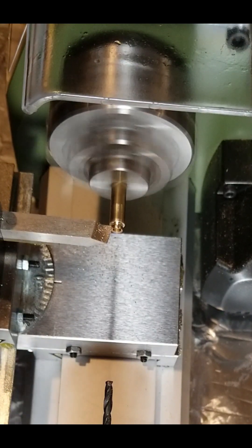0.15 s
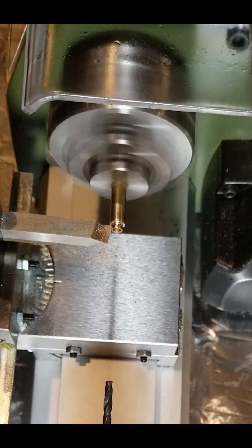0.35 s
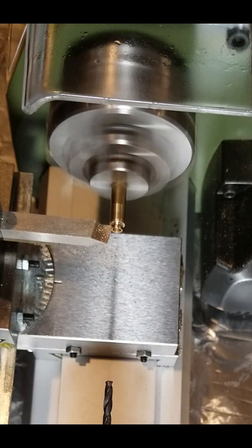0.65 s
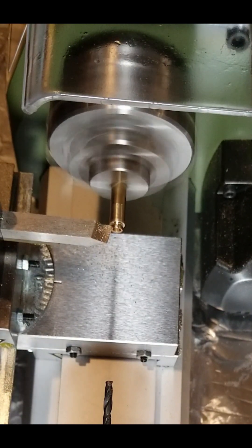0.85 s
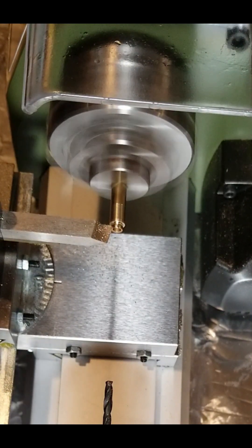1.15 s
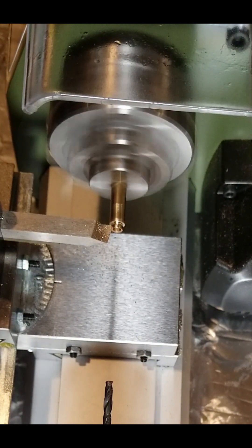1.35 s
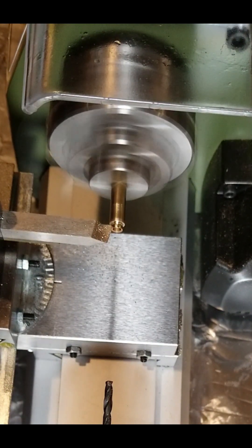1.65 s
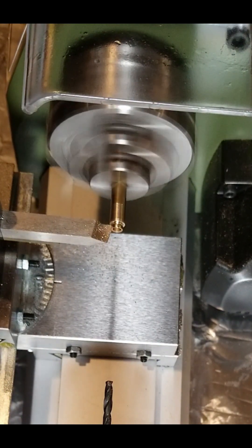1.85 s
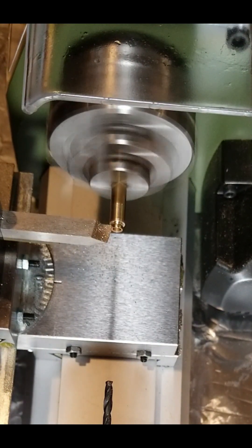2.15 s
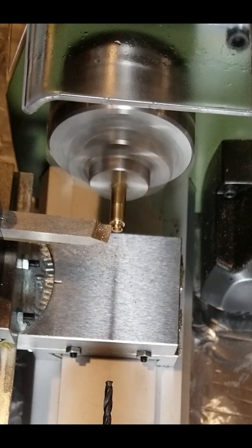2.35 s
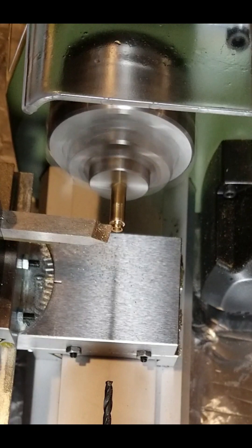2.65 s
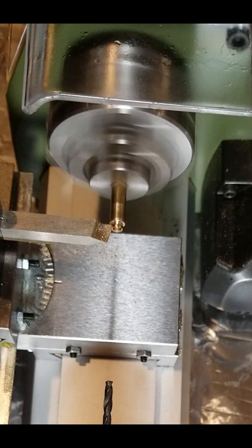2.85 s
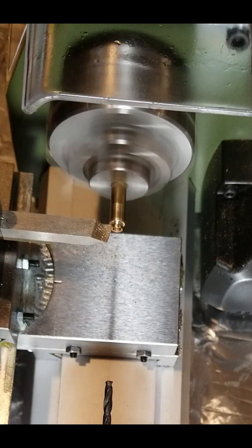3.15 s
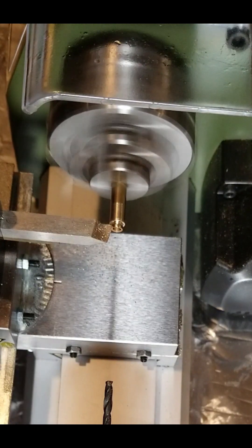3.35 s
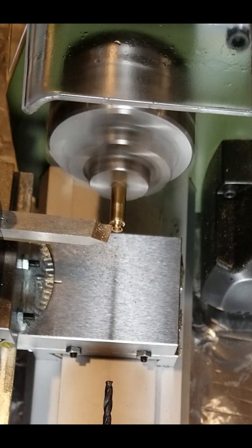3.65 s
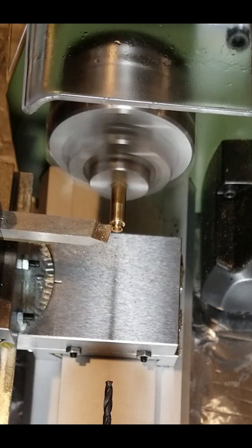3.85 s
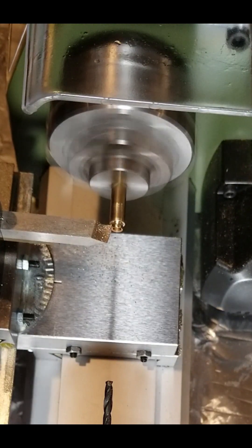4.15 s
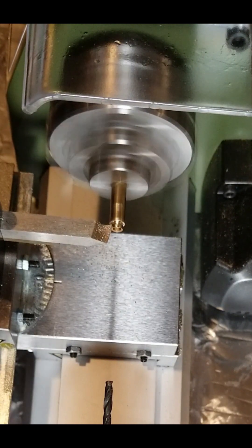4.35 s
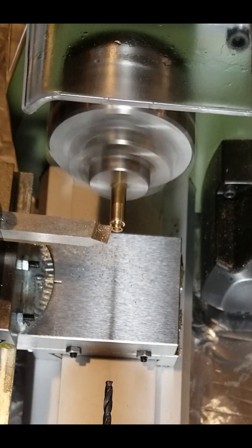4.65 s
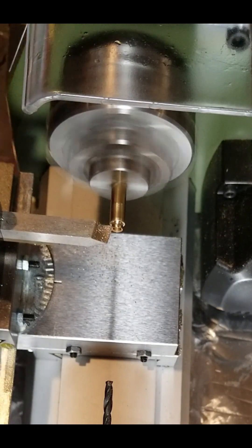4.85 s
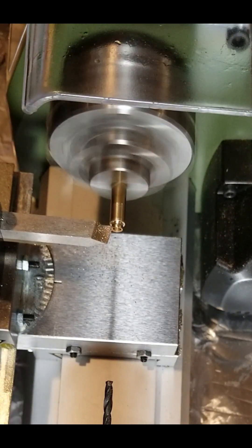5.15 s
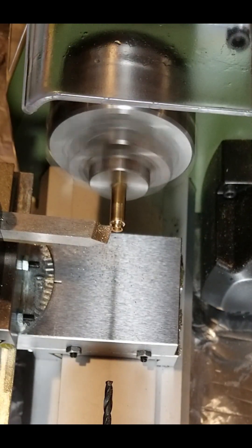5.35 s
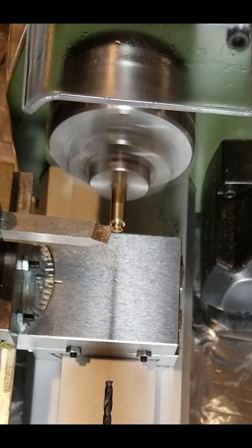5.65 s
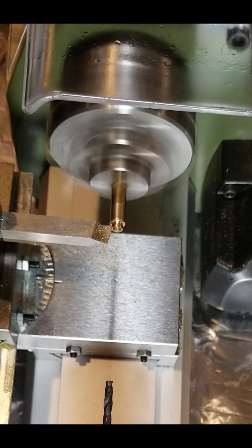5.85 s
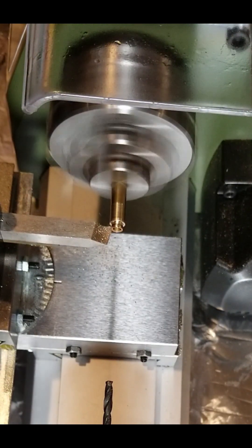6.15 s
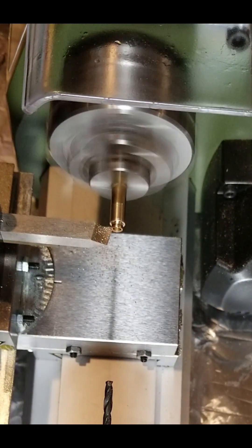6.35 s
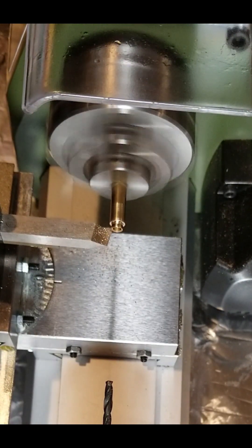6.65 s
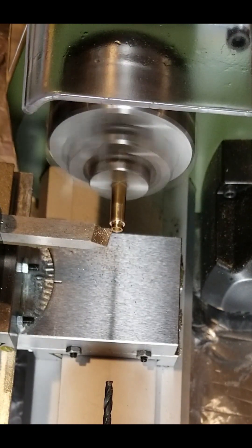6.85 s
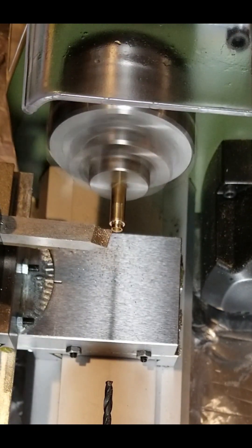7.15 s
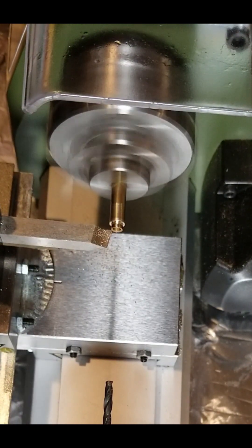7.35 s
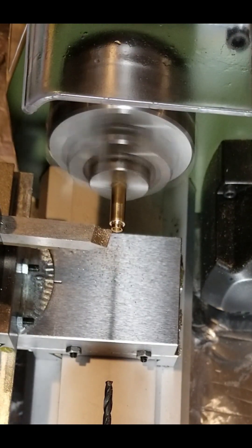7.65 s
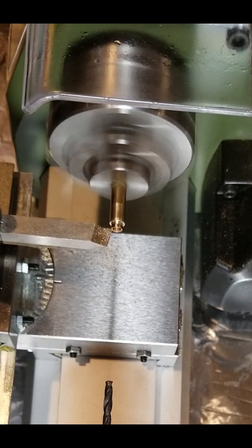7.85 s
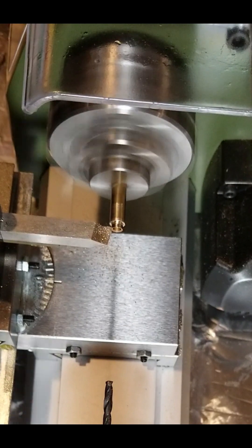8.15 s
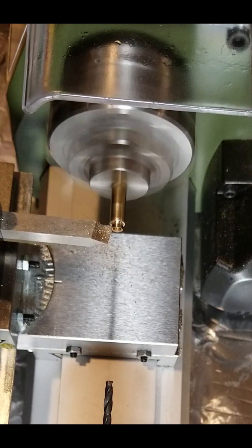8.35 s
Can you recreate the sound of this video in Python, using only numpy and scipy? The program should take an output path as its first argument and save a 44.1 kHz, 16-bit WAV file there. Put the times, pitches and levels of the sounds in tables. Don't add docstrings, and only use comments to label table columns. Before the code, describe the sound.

Rapid piercing squeaks stutter over an electric motor whine and hum as brass is turned; later the squeals fade and rhythmic rough scrapes follow.

```python
import sys
import numpy as np
from scipy import signal
from scipy.io import wavfile
from scipy.ndimage import uniform_filter1d

SR = 44100
rng = np.random.default_rng(int(sys.argv[2]) if len(sys.argv) > 2 else 0)


def generate_wav(sig):
    pcm = np.round(np.clip(np.atleast_2d(sig).T, -1, 1) * 32767).astype(np.int16)
    wavfile.write(sys.argv[1], SR, pcm)


def nominal_scale(level):
    x = np.asarray(level, float) / 20
    return 10 ** x


N = 374838

TEETH, TEETH_PER_TURN = 22, 51.3
MEAN_WHINE_DB, MEAN_RASP_DB = -44, -50
UPPER_DB = -55
CASING_LEAD = 8
NIP_DB, NIP_HZ, NIP_MS = 5.5, 4020, 1.2
SILENT_DB, HIGH_ENDS_MS = -60, 6.96

# time in seconds, speed swing as a share, hum wander in Hz.
SPEED_JITTER = [(0, .0025, 3), (2.6, .0025, 3), (3.5, .0006, 1.2), (8.5, .0006, 1.2)]
# time in seconds, peak in dB, length in ms.
DIGS = [(4.011, -26, 12), (4.395, -31, 11), (4.4935, -30, 14), (5.266, -28, 24), (5.308, -32, 11.3),
        (5.442, -29, 12), (5.586, -34, 16), (5.938, -26, 33), (5.9624, -25, 20), (6.007, -24.5, 19),
        (6.102, -25, 6.3), (6.142, -17, 11), (6.183, -30, 16), (6.25, -28, 37), (6.297, -24.5, 22),
        (6.347, -23, 13), (6.3948, -21, 7.2), (6.522, -22, 20), (6.565, -26.5, 22), (6.657, -30.5, 53),
        (7.997, -21, 12.5), (8.088, -26.5, 23), (8.1321, -29.5, 9.8), (8.175, -28, 26), (8.216, -26, 21),
        (8.2666, -24, 28), (8.321, -24.5, 20), (8.371, -29, 30), (8.4034, -22.5, 17), (8.443, -23.5, 23)]


def unit(x):
    return x / np.sqrt(np.mean(np.abs(x) ** 2) + 1e-20)


def in_time(rows):
    s, *columns = np.transpose(rows)
    return [np.interp(np.arange(N) / SR, s, c) for c in columns]


def at_hz(points, hz):
    points_hz, values = np.array(points).T
    return np.interp(np.log(hz), np.log(points_hz), values)


def drift(rate_hz):
    r = np.exp(-80 * np.pi * rate_hz / SR)
    slow = signal.lfilter([1], [1, -2 * r, r * r], rng.standard_normal(N // 40 + 2002))[2000:]
    return np.interp(np.arange(N) / 40, np.arange(len(slow)), unit(slow))


def bandpass(x, low_hz, high_hz):
    return signal.sosfilt(signal.butter(2, [low_hz, high_hz], "band", fs=SR, output="sos"), x)


def resonate(x, hz, width_hz):
    r = np.exp(-np.pi * width_hz / SR)
    poles = [1, -2 * r * np.cos(2 * np.pi * hz / SR), r * r]
    return signal.lfilter([(1 - r * r) / 2, 0, (r * r - 1) / 2], poles, x)


def body(x, modes):
    out = 0
    for k, (hz, width_hz, db) in enumerate(modes):
        ringing = resonate(resonate(x, hz, 1.6 * width_hz), hz, 1.6 * width_hz)
        out = out + nominal_scale(db) * (-1) ** k * ringing
    return unit(out)


def balance(pan_db):
    return nominal_scale([[pan_db / 2], [-pan_db / 2]])


def pair(mid, side, alike, pan_db):
    return (np.sqrt(1 + alike) * mid + np.sqrt(1 - alike) * side * [[1], [-1]]) * balance(pan_db)


def tone(wave, pan_db, lead_rad):
    return np.real(wave * balance(pan_db) * [[1], [np.exp(-1j * lead_rad)]])


def spaced(x, count):
    return np.array([x[0], np.roll(x[1], count)])


def add(out, s, wave):
    i = round(s * SR) - wave.shape[1] // 2
    low, high = max(i, 0), min(i + wave.shape[1], N)
    out[:, low:high] += wave[:, low - i:high - i]


def squeal_rows():
    # time in seconds, low mode peak in dB, its length
    # in ms, high mode peak in dB, its end in ms.
    main_bites = [(0.0038, -12, 3.2, -16, 8.4), (0.0217, -17, 3.9, -20, 14), (0.0427, -36, 2.5, -24, 5.8),
                  (0.0523, -12, 3, -18, 8.3), (0.0833, -20, 4, -30, 8.3), (0.1008, -12, 2.4, -16, 8.2),
                  (0.1476, -28, 3.9, -26, 9.9), (0.1646, -25.5, 2.9, -28, 8.7), (0.187, -42.5, 2.5, -26.0, 5.5),
                  (0.1964, -12, 4.9, -15, 7.3), (0.2422, -19.5, 3.3, -26, 6.6), (0.288, -18.5, 3.7, -23, 6.9),
                  (0.3201, -41, 2.5, -28.5, 5.8), (0.3292, -28.0, 2.8, -39.0, 5.9), (0.3485, -14.5, 2.8, -17, 8),
                  (0.36, -25, 2.6, -37, 6.5), (0.3695, -17.5, 2.7, -19, 6.1), (0.3809, -24.5, 2.9, -36.0, 8.3),
                  (0.4004, -10.5, 2.7, -13, 6.2), (0.4102, -24, 5.9, -27.5, 6.8), (0.4212, -12.5, 3.2, -16, 5.1),
                  (0.4393, -29, 5.5, -32, 12), (0.4526, -14, 3.1, -19.0, 6.5), (0.4974, -11.5, 3.9, -13, 5.7),
                  (0.5289, -36, 3.8, -28.5, 8.3), (0.5436, -21, 2.5, -21, 12), (0.5686, -47.5, 2.5, -19, 5.2),
                  (0.5775, -14, 4.5, -22.0, 7.9), (0.591, -10.5, 3.9, -15, 7.4), (0.6227, -26, 3.3, -36.5, 5.9),
                  (0.6373, -25, 2.6, -33, 7.0), (0.6484, -25, 3.3, -23, 9.7), (0.666, -36.5, 2.5, -30.0, 8.7),
                  (0.68, -31, 2.5, -38, 12.8), (0.6981, -22, 2.8, -21.5, 8.2), (0.7495, -25, 3.8, -26.5, 15),
                  (0.7804, -27, 3.6, -31, 10), (0.796, -12, 4, -12.5, 6.5), (0.8036, -27.5, 2.0, -41, 7.6),
            (0.8095, -39, 2.5, -40, 6.1), (0.8274, -22.5, 3.7, -22, 7.9), (0.8386, -24, 2.9, -28.5, 7.7),
            (0.8583, -28, 2.5, -26, 9.8), (0.8895, -10, 2.4, -15.5, 9.6), (0.9227, -10.5, 3.5, -21, 8.9),
            (0.9353, -17.0, 2.7, -22, 8.2), (0.9565, -11.5, 3.2, -13.5, 6.4),
            (0.9643, -27.5, 2.0, -35.5, 5.7), (0.9878, -19.5, 2.5, -25, 6.6),
            (1.0113, -46.0, 2.5, -28.5, 6.5), (1.025, -37.5, 2.5, -30.0, 4.9),
            (1.033, -21, 4.7, -33.5, 7.3), (1.1155, -49.0, 2.5, -30.0, 4.9), (1.124, -11.5, 2.9, -19, 7.4),
            (1.1763, -46.0, 2.5, -29.0, 5.1), (1.1841, -19.5, 2.8, -33.0, 5.4),
            (1.2397, -29, 3.2, -46, 9.1), (1.279, -21, 3.0, -27, 7.7), (1.298, -20.0, 2.5, -25.0, 9.7),
            (1.3212, -40.5, 2.5, -28.0, 5.9), (1.3297, -16, 3.7, -23, 5.6), (1.3433, -43, 2.5, -31, 4.7),
            (1.3518, -11.0, 2.9, -10, 6.3), (1.3618, -28.0, 3.1, -38, 12), (1.373, -34, 2.5, -37, 7.1),
            (1.383, -21.5, 3.6, -37.0, 7.2), (1.3962, -11.5, 2.9, -13.5, 6.7), (1.42, -43.5, 2.5, -18, 6.2),
            (1.4282, -9.5, 3.2, -18, 7), (1.461, -33, 3.9, -23, 8.4), (1.4703, -10, 3.5, -19, 7.1),
            (1.486, -14, 2.7, -17.5, 8.7),
                  (1.5063, -19, 2.4, -21, 8.5), (1.5171, -29, 4.0, -39, 8.2), (1.5543, -15.5, 2.2, -14.5, 8.1),
              (1.5864, -16, 2.4, -15.5, 8.3), (1.61, -27.5, 3.7, -30.5, 8.1), (1.635, -9.5, 4.1, -16, 7.9),
              (1.6485, -43.5, 2.5, -32, 6.5), (1.657, -25, 2.7, -21, 6.5), (1.666, -11, 3.6, -24, 5.0),
              (1.678, -11.5, 2.3, -14.5, 7), (1.7596, -46.0, 2.5, -23, 5.9), (1.7668, -13, 2.5, -17, 8),
              (1.799, -27, 4.2, -37.0, 4.9), (1.844, -23.5, 2.6, -25, 4.5), (1.9021, -22, 2.5, -26, 9.8),
              (2.1843, -31, 3.1, -36.5, 4.5), (2.2094, -26, 2.8, -27, 5.2), (2.2398, -20.5, 3.7, -17, 4.1),
              (2.2636, -44.5, 2.5, -27, 6), (2.2774, -22.5, 3.6, -22.5, 10), (2.3089, -21, 3.5, -23, 11),
              (2.3188, -9, 3, -16, 8), (2.3558, -29.5, 2.5, -27, 7.7), (2.3656, -12, 3.8, -25, 6.2),
              (2.42, -17, 2.8, -23, 6.0), (2.4415, -10.5, 3, -15, 7.6), (2.4653, -43.0, 2.5, -21.5, 5.7),
              (2.4736, -10, 4, -17, 5.7), (2.7266, -24.5, 2.9, -31, 4.5), (2.8378, -29, 3.5, -38.0, 4.5),
              (3.0639, -25.5, 2.9, -42.0, 4.6), (3.117, -23.5, 2.7, -34.0, 4.7), (3.23, -26, 2.2, -31.5, 7),
              (3.255, -54.0, 2.5, -27, 5.0), (3.2617, -21, 4.4, -29, 5.1), (3.3138, -27.5, 3.8, -33.5, 4.8)]
    catches = [
        (4.01, -29, 3, -42, 5),
        (4.4931, -22, 4.1, -36, 5.7),
    ]
    # time in seconds, peak in dB.
    ticks = [(2.5308, -29), (2.5846, -27), (2.6126, -27), (2.653, -31), (2.6765, -28), (2.7687, -29),
             (2.7927, -30), (2.872, -26), (2.9194, -35), (2.9493, -32), (2.979, -29), (3.0306, -26),
             (3.048, -27), (3.075, -25), (3.2965, -26), (3.3717, -36), (3.405, -29), (3.4441, -41),
             (3.5099, -39), (3.5902, -30), (3.6531, -39), (3.704, -35), (3.8167, -29), (3.9759, -36)]
    squeals = main_bites + catches + [(s + 0.0018, db, NIP_MS, db - 6, 5) for s, db in ticks]
    return [(s, db, 4066 - 4.3 * db, ms, high_db - 1.5, end_ms) for s, db, ms, high_db, end_ms in squeals]


def flutter_rows(chatter_db):
    rows = []
    for s, size, split, ms in rng.random((360, 4)) * [N / SR, 1, 1, 1]:
        db = chatter_db[int(s * SR)] - 3.5 + 7 * size - 7 * (2.5 < s < 3.4)
        high_db = db + 0.5 - 9 * split - 10 * (s > 3.4)
        rows.append((s, db, 4200, 1.0 + 1.1 * ms, high_db, 5 + 3 * ms))
    return rows


def dig_rows():
    rows = []
    for (s, db, ms), (a, b) in zip(DIGS, rng.random((len(DIGS), 2)) - .5):
        rows.append((s, db + NIP_DB - 0.3017 * ms, NIP_HZ + 170 * a, NIP_MS + b, SILENT_DB, HIGH_ENDS_MS))
    return rows


def burr_rows():
    # time in seconds, peak in dB.
    burr = [(4.6805, -33), (5.0053, -33), (5.2638, -29), (5.4333, -38), (5.4852, -36), (5.584, -33),
            (5.613, -36), (5.6279, -31), (5.7002, -33), (5.7626, -31), (5.812, -30), (5.9067, -30)]
    return [(s + NIP_MS / 1000, db + NIP_DB, NIP_HZ, NIP_MS, SILENT_DB, HIGH_ENDS_MS) for s, db in burr]


def low_mode(t, hz, ms, c):
    swell = np.exp(-(t / (ms / 1000 * np.where(t < 0, .7, .4))) ** 2)
    climb_hz_per_s = np.where(t < 0, 50000 * c[2] - 15000, 85000)
    return swell * np.exp(1j * 2 * np.pi * (hz * t + climb_hz_per_s * t ** 2 + c[0]))


def high_mode(t, end_ms, c):
    hold = .5 * (np.tanh((t - .0023) / .0009) - np.tanh((t - end_ms / 1000) / .0014))
    hold = hold * nominal_scale(.8 * np.sin(2 * np.pi * (300 * t + c[2])))
    hold = hold + .08 * (t > .002) * np.exp(-np.abs(t) / .007)
    climb = 380 * .0016 * np.exp(-np.maximum(t - .001, -.002) / .0016)
    return hold * np.exp(1j * 2 * np.pi * ((4680 + 130 * c[3]) * t + climb + c[1]))


def hand_over(t, low, low_db, high, high_db, cracks, c):
    sweep = np.exp(1j * 2 * np.pi * (4400 * t + 50000 * (t - .001) ** 2 + c[0]))
    lift = np.exp(-((t - .002) / 0.0054) ** 2)
    start = round(c[1] * 4000)
    wave = nominal_scale(low_db - 30.5) * tone(low ** 2, pan_db=8, lead_rad=.1)
    wave += nominal_scale(high_db - 27.0) * tone(np.roll(lift, 50) * high ** 2, pan_db=24.5, lead_rad=.1)
    wave += nominal_scale(low_db - 22) * lift ** 2 * cracks[:, start:start + len(t)]
    wave += nominal_scale(low_db - 29.5) * tone(lift * sweep ** 3, pan_db=7, lead_rad=11.4)
    return wave


def bites(chatter_db):
    out, t = np.zeros((2, N)), np.arange(-650, 651) / SR
    rows = squeal_rows() + dig_rows() + flutter_rows(chatter_db) + burr_rows()
    cracks = bandpass(rng.standard_normal((2, 6001)), 2500, 14000)
    for (s, low_db, low_hz, ms, high_db, end_ms), c in zip(rows, rng.random((len(rows), 4))):
        low, high = low_mode(t, low_hz, ms, c), high_mode(t, end_ms, c)
        wave = nominal_scale(low_db) * tone(low, pan_db=7.5, lead_rad=4.92)
        wave += nominal_scale(high_db) * tone(high, pan_db=-3.0, lead_rad=4.79)
        wave += hand_over(t, low, low_db, high, high_db, cracks, c)
        add(out, s, wave)
    return out


def whine(teeth, tooth_hz, first_db):
    # multiple of tooth rate, level in dB,
    # tilt in dB per Hz of tooth rate, left-right in dB, left lead in rad.
    orders = [(.2525, -15.5, 0.2, 13, 0.24), (1.045, -11, 1.5, 5, 0.5), (1.203, -3.5, -0.1, 7, 0.27),
              (1.25, -12, 2, -1, 0.76), (2, 4.6, .5, 7, 2.54), (1.955, -6, 0, -2, 3.17),
              (2.045, -11, 1, -2, 0.4), (2.955, -10, -0.54, 6, 0.39), (3, -6.5, 0.5, -15, 0.7),
              (4, 2, 0, -0.5, 4.74), (5, 1.5, 0, -12.5, 2.7), (6, -22, 0, -6, .3), (7, -10, 0, -2, 0.27),
              (8, -9, 0, 3, 1.5), (9, -10, -.2, 0, 1), (10, 4.5, -0.27, -7.5, 4.53),
              (11, -4, -.2, -2, 2), (12, -13, .5, 6, 1.28), (13, -10, .3, -10, 6.9),
              (1.907, -20, 1, 2, 1), (3.044, -17, .5, 2, 1), (1.089, -14, 1, 3, .5), (1.295, -18, 1, 3, .5),
            (2.087, -15, 1, 2, 1), (2.158, -15, 1, 2, 1), (2.25, -16, 1, 2, 1), (2.309, -15, -1, 2, 1),
            (2.577, -15, -1, 2, 1), (3.452, -13, 0, 2, 1), (4.25, -19, .5, 0, 1), (4.5, -16, 0, 0, 1),
            (4.797, -13, .1, 0, 1), (9.955, -6, .5, 12, 1), (10.96, -11, -.2, 0, 1)]
    run_out = 0.022 * np.sin(teeth / TEETH) + 0.078 * np.sin(2 * teeth / TEETH_PER_TURN)
    phase = teeth + run_out + 0.03 * drift(90)
    first = nominal_scale(first_db + 4.5 + 0.06 * drift(1.0)) * np.exp(1j * phase)
    out = tone(first, pan_db=5.5, lead_rad=0.59)
    upper_db = UPPER_DB + 0.72 * (first_db - MEAN_WHINE_DB)
    for k, db, tilt, pan_db, lead_rad in orders:
        casing_db = 11 * np.exp(-((k * tooth_hz - 3315) / 18) ** 2)
        tilt_db = np.clip(tilt * (tooth_hz - 1110), -6, 6)
        level_db = upper_db + db + tilt_db + casing_db + 0.27 * drift(7.3)
        out += tone(nominal_scale(level_db + 3.5) * np.exp(1j * k * phase), pan_db, lead_rad)
    return out


def hum(hum_db):
    # multiple of the hum rate, level in dB.
    multiples = [(1, 0.5), (2, -6), (3, -12.5), (4, -14)]
    slips = rng.random(N) < 6.0 * nominal_scale(3 * drift(1.2)) / SR
    late = uniform_filter1d(uniform_filter1d(np.cumsum(slips) * np.pi, size=1100), size=1100)
    phase = 2 * np.pi * np.cumsum(120.87 + in_time(SPEED_JITTER)[1] * drift(10.77)) / SR
    out = 0
    for k, db in multiples:
        level = nominal_scale(hum_db + db + 6.5 + 1.0 * k * drift(60))
        wave = -level * np.exp(1j * (k * phase - k % 2 * late))
        out = out + tone(wave, pan_db=0.5, lead_rad=0.073 * k * k)
    return signal.sosfilt(signal.butter(6, 92, "high", fs=SR, output="sos"), out)


def follow(first_db, rasp_db, level_db, per_whine, per_rasp):
    return level_db + per_whine * (first_db - MEAN_WHINE_DB) + per_rasp * (rasp_db - MEAN_RASP_DB)


def banded_noise(spectrum, flicker, patchy_db, pan_db, count):
    # frequency in Hz, left-right likeness.
    likeness = [(35, 0.66), (100, 1), (800, 0.99), (1500, 0.74), (2500, 0.53), (6000, 0.07), (14000, 0.71)]
    bottom_hz, top_hz = spectrum[0][0], spectrum[-1][0]
    edges = bottom_hz * 2 ** np.arange(0, np.log2(top_hz / bottom_hz) + .05, 1 / count)
    white = rng.standard_normal((2, 2, N)) * flicker
    out = 0
    for k, (low, high) in enumerate(zip(edges, edges[1:])):
        mid, side = bandpass(white[k % 2], low, high)
        hz = np.sqrt(low * high)
        gain = nominal_scale(at_hz(spectrum, hz) + patchy_db * drift(22.0))
        out = out + gain * pair(mid, side, np.clip(at_hz(likeness, hz), 0, 1), pan_db)
    return unit(out)


def housing_noise(throb, first_db, rasp_db):
    # frequency in Hz, density in dB per Hz.
    spectrum = [(20, -1), (50, -7.5), (75, -2.5), (240, -2.5), (430, -10), (560, 0.5), (650, -8.5),
                (950, -5), (1300, 6), (1520, -2), (1850, -6.5), (2400, 0), (2900, -9), (4000, -10),
                (4700, -7), (5800, -5)]
    level_db = follow(first_db, rasp_db, level_db=-46, per_whine=0.26, per_rasp=0.24)
    return nominal_scale(level_db + 4.5) * banded_noise(spectrum, throb, patchy_db=0.0, pan_db=2.0, count=4)


def bearing_hiss(throb, first_db, rasp_db):
    # frequency in Hz, density in dB per Hz.
    spectrum = [(5000, 2.5), (5700, -7.5), (6200, -3), (6900, 0.5), (7400, -12), (7900, -5), (8400, -15),
                (8900, -6.5), (9450, -35), (10400, -7), (12200, -6.5), (13300, -3.5), (13900, 1.5),
                (14600, -15.5), (15600, -2.5), (17000, -4)]
    level_db = follow(first_db, rasp_db, level_db=-40, per_whine=0.39, per_rasp=0.08)
    return nominal_scale(level_db - 2.0) * banded_noise(spectrum, throb, patchy_db=-1.1, pan_db=-1.5, count=9)


def gear_noise(throb, first_db):
    # mode in Hz, width in Hz, level in dB.
    gearbox = [(1490, 37, -2.5), (2396, 230, -1.5), (8730, 260, -22), (10030, 390, -16), (10900, 200, -3),
               (12000, 200, -11), (13900, 200, -12), (14800, 400, -8)]
    level = nominal_scale(UPPER_DB + 5 + 0.8 * (first_db - MEAN_WHINE_DB))
    return level * throb * pair(*body(rng.standard_normal((2, N)), gearbox), alike=0.92, pan_db=3.5)


def cut_depth(teeth, rasp_db):
    turn = nominal_scale(0.79 * np.sin(teeth / TEETH_PER_TURN + 1.1) + 2.93 * drift(47))
    return nominal_scale(rasp_db - 0.7 + np.minimum(rasp_db + 54, 0)) * turn + digs()


def rasp(chips, depth):
    # mode in Hz, width in Hz, level in dB.
    holder = [(670, 84, -3.5), (2430, 260, -13.5), (3344, 200, -5), (3850, 350, -1), (4530, 680, -13),
              (5060, 100, -36)]
    return depth * pair(*body(chips, holder), alike=.7, pan_db=1.5)


def light_chatter(chips, chatter_db):
    grip = nominal_scale(5.5 * drift(80))
    low = pair(*body(chips * grip, [(4200, 160, 0)]), alike=.9, pan_db=8)
    late_grip = np.roll(grip, round(.004 * SR))
    high = pair(*body(chips * late_grip, [(4680, 110, 0)]), alike=.85, pan_db=-5)
    return nominal_scale(chatter_db - 11.5) * (low + nominal_scale(-7.5) * high)


def tool_post(chips, depth, chatter_db):
    # mode in Hz, width in Hz, level in dB.
    modes = [(2985, 75, 7.5), (2710, 660, 1), (5750, 220, -4.5)]
    ring = nominal_scale(-60.5 + 0.18 * (chatter_db - MEAN_WHINE_DB)) + nominal_scale(-5.5) * depth
    return ring * pair(*body(chips, modes), alike=.93, pan_db=1.5)


def bed_ring(bed_db):
    # mode in Hz, width in Hz, level in dB.
    modes = [(730, 26, 2), (782, 40, 3), (830, 30, 0), (880, 70, -10), (3056, 95, -8)]
    noise = rng.standard_normal((2, N)) * nominal_scale(1.2 * drift(43))
    return (nominal_scale(bed_db - 7.0) + knocks()) * pair(*body(noise, modes), alike=0.92, pan_db=3.0)


def shaving(teeth, first_db, rasp_db, chatter_db):
    chips = rng.standard_normal((2, N)) * nominal_scale(4.3 * np.minimum(rng.exponential(1, N), 4.5))
    depth = cut_depth(teeth, rasp_db)
    bed_db = follow(first_db, rasp_db, level_db=-43.5, per_whine=0.0061, per_rasp=0.8)
    out = spaced(rasp(chips, depth), count=9)
    out += spaced(tool_post(chips, depth, chatter_db), count=15)
    return out + spaced(light_chatter(chips, chatter_db) + bed_ring(bed_db), CASING_LEAD)


def knocks():
    # time in seconds, peak in dB.
    events = [(0.119, -21), (0.219, -26), (1.119, -20), (1.195, -23), (1.61, -19), (1.868, -28),
              (2.261, -25), (2.314, -24), (2.571, -25), (2.77, -29), (3.025, -29), (3.651, -28),
              (3.864, -30), (4.006, -35), (4.661, -27), (4.742, -31), (4.865, -32), (5.292, -28),
              (5.924, -25), (6.255, -32), (6.969, -28), (7.762, -26)]
    out, t = np.zeros((1, N)), np.arange(-4000, 4001) / SR
    rise_s, fall_s = 0.0024, 0.031
    hump = np.exp(-(t / np.where(t < 0, rise_s, fall_s)) ** 2)[None]
    for s, db in events:
        add(out, s + rise_s, nominal_scale(db - 24) * hump)
    return out


def digs():
    out, t = np.zeros((1, N)), np.arange(-2000, 2001) / SR
    crest = 0.68 * np.exp(-(t / 0.00097) ** 2)
    for s, db, ms in DIGS:
        hump = np.exp(-(t / (0.6 * ms / 1000)) ** 2)
        add(out, s, nominal_scale(db - 13.0) * (hump + crest)[None])
    return out


def dips(x):
    # centre in Hz, width in Hz, share removed.
    bands = [(440, 40, .5), (640, 90, .7), (3660, 200, .5), (6300, 300, .5), (9420, 480, .85),
             (13600, 500, .4)]
    for hz, width_hz, share in bands:
        x = x - share * resonate(x, hz, width_hz)
    return x


def scene():
    # time in seconds, tooth rate under load in Hz.
    speed = [(0, 1090), (1.2, 1093), (1.45, 1086), (2.1, 1093), (2.35, 1087), (3.34, 1099), (3.5, 1113),
             (4.3, 1109), (5, 1104.5), (5.45, 1109), (6, 1107), (6.6, 1111), (6.95, 1121), (7.75, 1123),
             (8.15, 1114), (8.5, 1110)]
    # time in seconds, first order in dB, controller hum in dB.
    motor = [(0.0, -51, -53.5), (2.0, -47.5, -52.5), (2.4, -49.5, -51.5), (2.8, -46.5, -51.5),
             (3.3, -46, -51.5), (3.5, -44, -50), (4.3, -40.5, -47), (4.8, -39, -48), (5.3, -39, -47),
             (5.9, -39.5, -48.5), (6.6, -40, -49), (6.9, -40, -50), (7.8, -39.5, -50), (8.15, -39.5, -49.5),
             (8.5, -40.5, -51.5)]
    # time in seconds, depth as rasp in dB, grip as light chatter in dB.
    cut = [(0, -48.5, -38), (1.15, -49.5, -37), (1.5, -48, -29), (1.8, -49, -37), (2.1, -49.5, -36),
           (2.4, -47, -32), (2.7, -47.5, -40), (3.3, -49.5, -38), (3.6, -51, -47), (4.2, -50, -44),
           (4.6, -45.5, -42), (5.2, -45, -55), (5.9, -45.5, -65), (6.6, -48.5, -38), (6.8, -53.5, -46),
           (7.8, -55, -66), (8.0, -49, -34), (8.5, -50.5, -39)]
    (tooth_hz,), (first_db, hum_db), (rasp_db, chatter_db) = in_time(speed), in_time(motor), in_time(cut)
    teeth = 2 * np.pi * np.cumsum(tooth_hz * (1 + in_time(SPEED_JITTER)[0] * drift(11.95))) / SR
    throb_db = 0.23 * np.sin(teeth / TEETH) + 1.7 * np.sin(2 * teeth / TEETH_PER_TURN) + 1.0 * drift(50)
    throb = nominal_scale(throb_db)
    casing = housing_noise(throb, first_db, rasp_db) + bearing_hiss(throb, first_db, rasp_db)
    noisy = spaced(casing, CASING_LEAD) + spaced(gear_noise(throb, first_db), count=9)
    noisy = dips(noisy + shaving(teeth, first_db, rasp_db, chatter_db))
    return bites(chatter_db) + whine(teeth, tooth_hz, first_db) + hum(hum_db) + noisy


def top_cut(x):
    return signal.sosfilt(signal.butter(12, 15970, fs=SR, output="sos"), x)


def record(dry):
    mix = signal.sosfilt(signal.cheby2(20, 60, 15980, fs=SR, output="sos"), dry)
    return top_cut(mix)


dry = scene()
out = record(dry)
generate_wav(out)
```